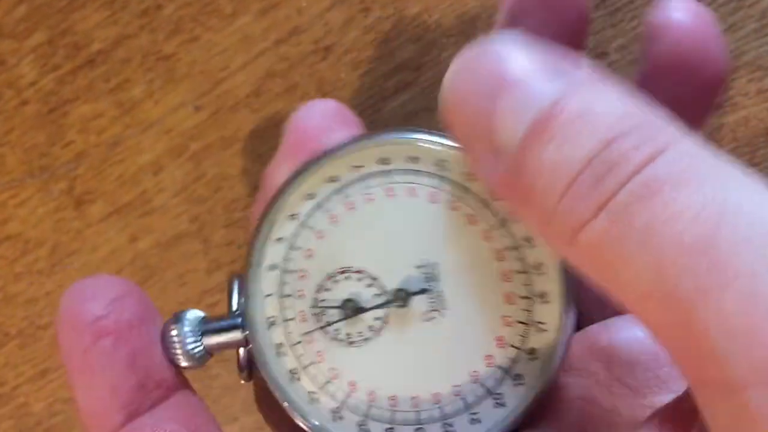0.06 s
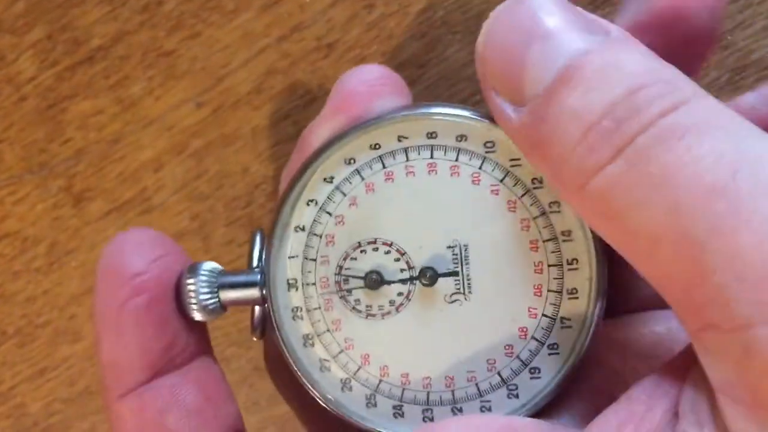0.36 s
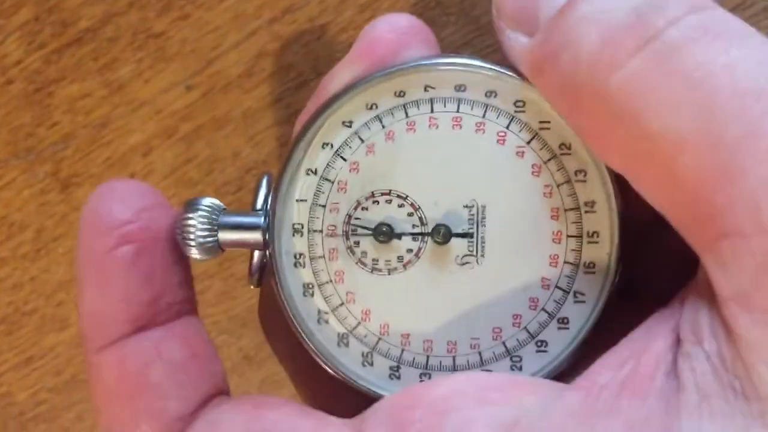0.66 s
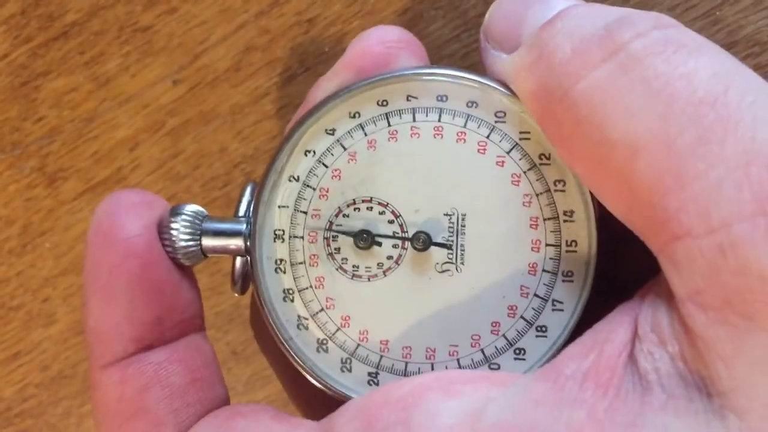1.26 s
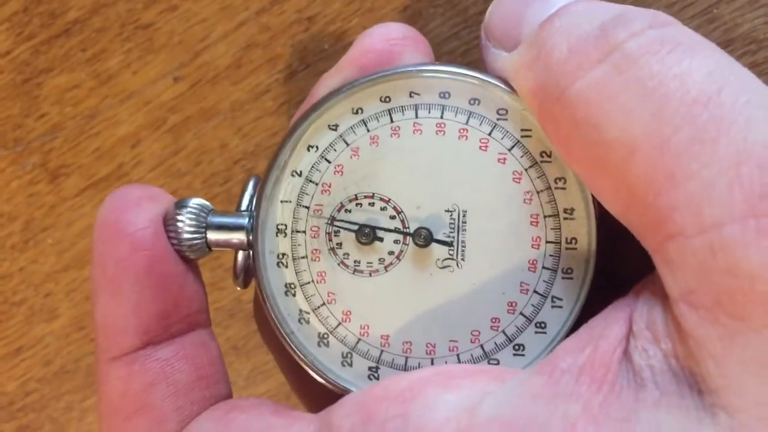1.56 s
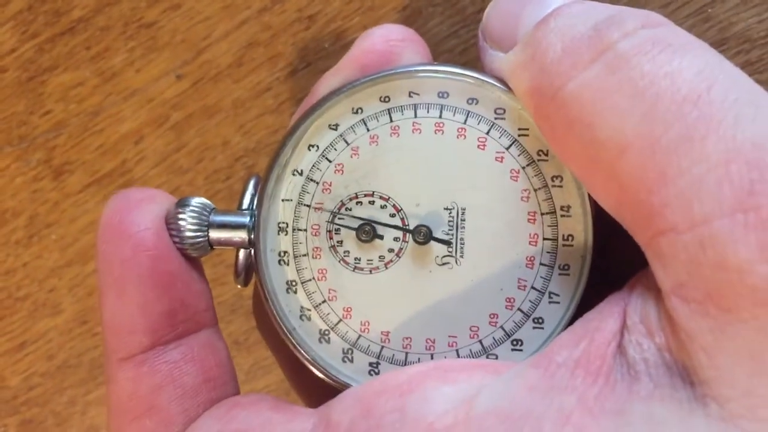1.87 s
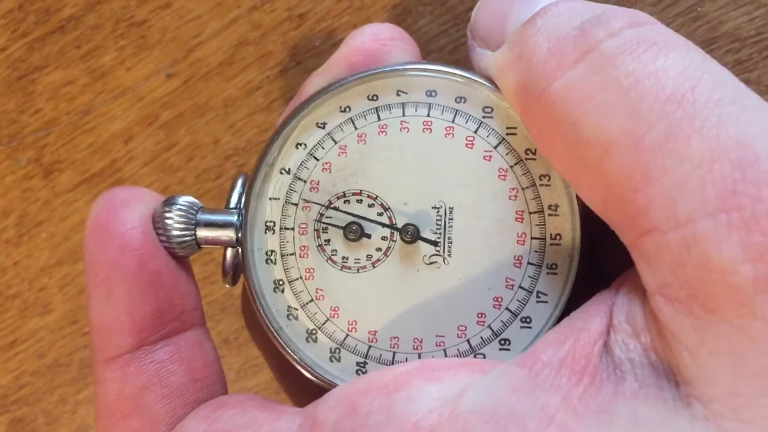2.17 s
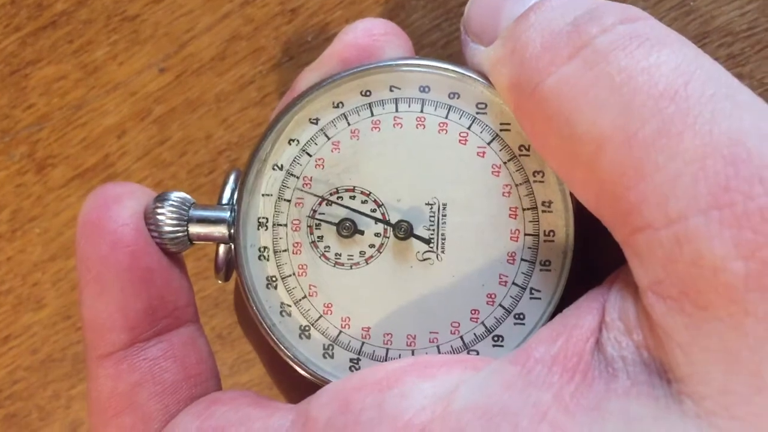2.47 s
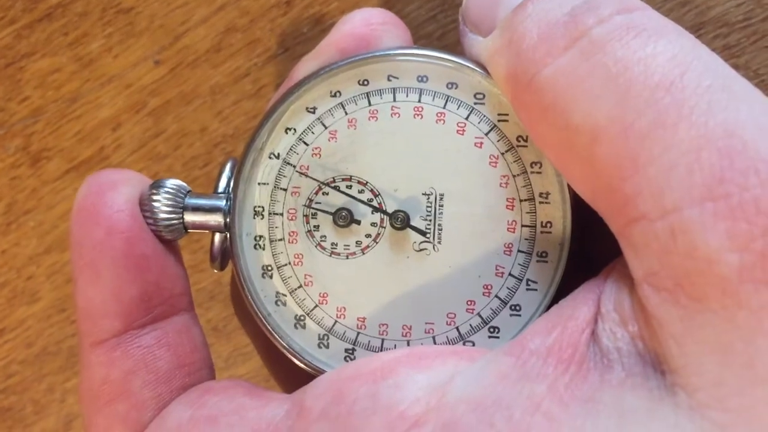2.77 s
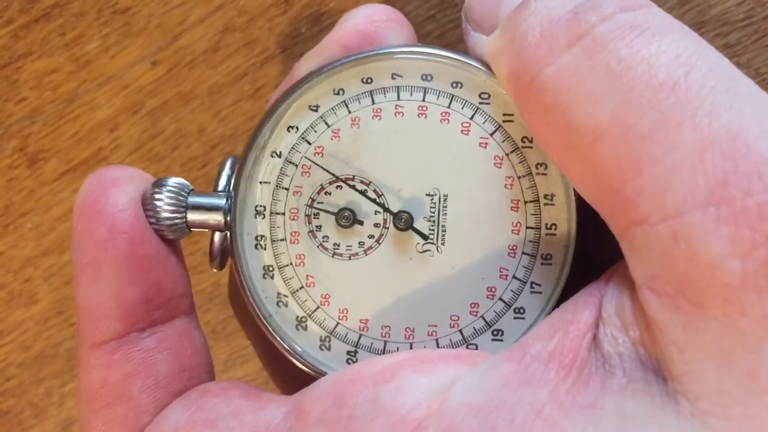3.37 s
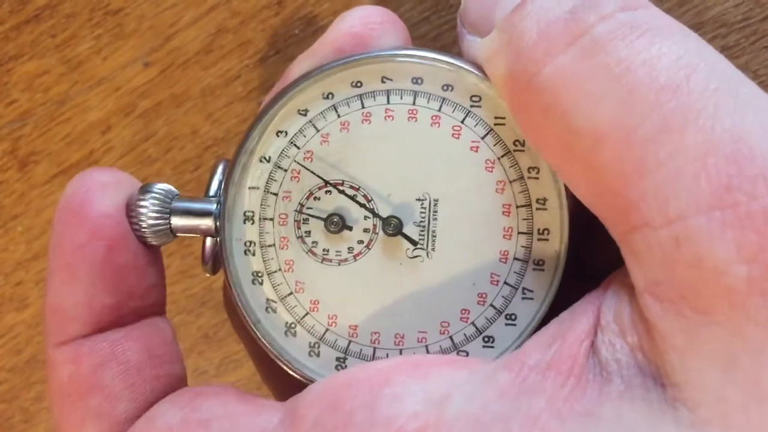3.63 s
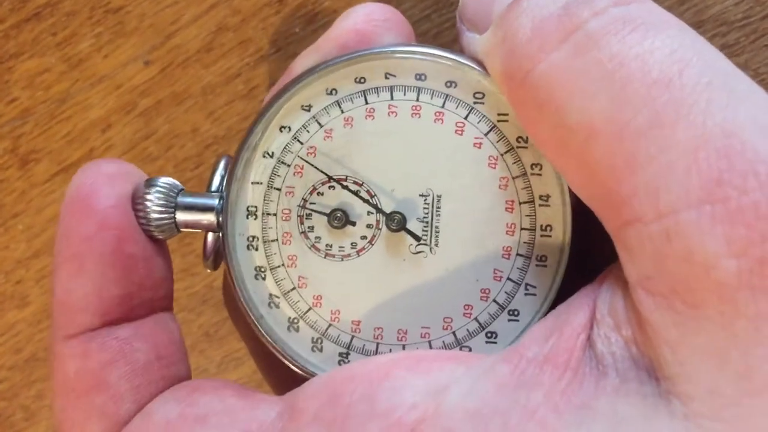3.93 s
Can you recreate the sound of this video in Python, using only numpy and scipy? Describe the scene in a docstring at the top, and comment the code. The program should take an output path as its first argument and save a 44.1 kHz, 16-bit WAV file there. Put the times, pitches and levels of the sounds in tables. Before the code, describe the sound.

A mechanical stopwatch ticks fast and evenly, close up in a small quiet room, with a few light button clicks and faint distant knocks. A loud metallic snap stops the ticking, and the button clicks again on release.

```python
"""A mechanical stopwatch ticks ten times a second, held close in a small quiet room. Each tick is a
tooth dropping on the pallet and ringing the plate; the hairspring sings on every other beat.
The crown clicks under the finger, is pressed home with a loud snap that stops the movement, and clicks
again as it is let go. Farther off something knocks softly once a second, like a wall clock."""
import sys
import numpy as np
from scipy import signal
from scipy.fft import rfft, irfft, next_fast_len
from scipy.io import wavfile
from scipy.ndimage import map_coordinates

SR = 44100
rng = np.random.default_rng(int(sys.argv[2]) if len(sys.argv) > 2 else 0)


def master_out(mix):
    """Clip the mix to full scale and print it as 16-bit PCM to the path in sys.argv[1]."""
    frames = np.transpose(np.atleast_2d(mix))
    ceiling = np.clip(frames, -1, 1)
    pcm = np.round(ceiling * 32767).astype(np.int16)
    wavfile.write(sys.argv[1], SR, pcm)


N = 176400
T = np.arange(SR // 2) / SR  # time within one hit [s]

# escapement beats (time [s], bright edge level [dB], body level [dB])
BEATS = [(0.0853, -61, -61), (0.1827, -44.5, -53.5), (0.2838, -50, -45.5), (0.3831, -45, -58),
         (.4843, -57.5, -63), (0.586, -51.5, -59.5), (.685, -60, -58.5), (0.7849, -49, -56.5),
         (0.8855, -60, -54), (0.9839, -57.5, -60.5), (1.0872, -66, -60), (1.1854, -50.5, -49.5),
         (1.286, -60, -54.5), (1.3855, -51, -57.5), (1.4882, -59, -56.5), (1.587, -58, -54),
         (1.689, -64, -59.5), (1.788, -53, -59), (1.8888, -67, -57.5), (1.9884, -58.5, -60),
         (2.0897, -68, -63), (2.1902, -55.5, -56), (2.2917, -64, -59.5), (2.3905, -52.5, -57),
         (2.4924, -59, -59.5), (2.5928, -59.5, -59), (2.6929, -59, -59.5), (2.7921, -56, -55.5),
         (2.893, -68, -56), (2.9925, -62, -60), (3.096, -65, -63), (3.1937, -58, -51), (3.295, -63, -59),
         (3.3938, -53, -56.5)]
# a tick's bright edge: narrow pallet resonances (frequency [Hz], gain [dB])
PALLET_EQ = [(8000, -31), (10150, -26.5), (10700, -15.5), (11200, -14.5), (11900, -6), (12350, 2.5),
             (12950, -15), (13350, 4), (14000, -3), (14550, -18), (15200, -4), (15700, -6.5), (16200, -25)]
# body of a tick or a lever's scrape (frequency [Hz], gain [dB])
BODY_EQ = [(1000, -27.5), (1900, -12.5), (2420, 3.5), (2950, -9.5), (3550, 4), (4600, -12), (5400, 1),
           (6450, 1.5), (7400, -3.5), (8300, -2), (10000, -5.5), (13000, -24)]
# modes of the movement's plate (frequency [Hz], level [dB], t60 [s])
PLATE_MODES = [(2240, -10, .06), (2500, -2.5, .05), (3500, -6.5, .03), (5300, -11, 0.051),
               (6380, -7, 0.054), (7400, -9, 0.032), (8240, -9, 0.023)]
# swell of the hairspring's singing (time [s], level [dB])
SPRING_SWELL = [(.08, -71), (.5, -69.5), (.7, -75), (.89, -59.5), (1.09, -70), (1.29, -58), (1.49, -60),
                (1.69, -53.5), (1.89, -55.5), (2.09, -55), (2.29, -60), (2.49, -54.5), (2.69, -56.5),
                (2.89, -66.5), (3.09, -67), (3.29, -59.5)]
# bursts in one balance swing (delay [s], frequency [Hz], level [dB], attack [s], t60 [s])
SWING_BURSTS = [(.004, 3610, -1.5, .002, .05), (.0115, 3575, 7, .002, .065), (.052, 3650, -5.5, .018, .1)]
# crown clicks (time [s], level in each of the six CLICK_BANDS [dB], decay stretch [ratio])
CROWN_CLICKS = [(0.2932, -32, -32.5, -31, -30, -47.5, -50, 1.08),
                (0.769, -55.5, -62, -72, -82, -86, -86, 2), (0.8518, -43, -44, -50, -52, -74, -82, 1.43),
                (1.577, -40.5, -40.5, -43, -53.5, -63.5, -65, 1.04),
                (3.4341, -37.5, -41.5, -35.5, -39.5, -44.5, -56.5, 1.08),
                (3.4702, -65.5, -69, -66, -65, -60, -63, 0.82),
                (3.4745, -50.5, -55, -47, -59, -57, -70, 1.35),
                (3.4813, -66, -65.5, -63, -72, -65, -72, 0.79),
                (3.4932, -18.5, -12, -17, -13.5, -14, -15, 0.94),
                (3.6708, -44, -51, -64, -73, -80, -80, 0.89), (3.71, -51.5, -53, -48, -64, -66, -70, 2.4),
                (3.7183, -50.5, -35.5, -41, -56.5, -64, -65, 1.3),
                (3.7228, -35, -27, -26.5, -29.5, -27, -42, 1.19),
                (3.846, -57, -65, -66.5, -77, -84, -83.5, 1.5),
                (3.973, -36, -39.5, -42.5, -49.5, -53.5, -63.5, 1)]
# bands that voice a click (low edge [Hz], high edge [Hz])
CLICK_BANDS = [(1000, 2100), (2100, 2700), (2700, 4800), (4800, 7000), (7000, 11800), (11800, 16000)]
# modes of the steel case (frequency [Hz], level [dB], unstretched t60 [s])
CASE_MODES = [(1310, -8, .02), (1560, -3, .018), (1880, -4, .018), (2075, -3, .022), (2395, 4, .026),
              (2600, -8, .018), (2910, -6, .026), (3470, -1, .02), (3900, -13, .018), (4250, -14, .014),
              (5380, -5, .016), (6550, 4, .014), (7350, -4, .016), (8240, -6, .022), (8830, -8, .014),
              (9430, -1, .01), (11100, -4, .007), (12780, -1, .016), (14070, -9, .014), (14900, -6, .007)]
# noisy crack of a blow on the case (frequency [Hz], gain [dB])
CRACK_EQ = [(60, -18.5), (300, -26), (850, -24), (1250, 4.5), (2400, -2), (4000, -4), (4800, -13),
            (6300, -1), (10000, -4.5), (15000, -1.5), (16200, -16.5)]
# thump as the snap jolts the hand (frequency [Hz], gain [dB])
THUMP_EQ = [(25, -4.5), (80, 7.5), (170, -6), (450, 2.5), (750, -6.5), (1000, -16), (1500, -30.5)]
# what the snap throws sideways into the room (frequency [Hz], gain [dB])
SPRAY_EQ = [(600, -39), (1200, -3.5), (2500, 0), (4500, -5.5), (6000, -5.5), (11000, -8), (16000, -7.5)]
# springs left ringing by press and release (time [s], frequency [Hz], level [dB], t60 [s])
SPRING_RINGS = [(3.4345, 6700, -59, 0.13), (3.4935, 2310, -48, 0.7), (3.4923, 2400, -47, .22),
                (3.4935, 2907, -48, .19), (3.4935, 3262, -58.5, .35), (3.723, 1110, -63.5, 0.47),
                (3.725, 4480, -63, .45), (3.722, 2859, -46, 0.19), (3.723, 3340, -55, 0.13)]
# distant knocks, in clusters a second apart (time [s], level [dB])
KNOCKS = [(.152, -48.5), (0.159, -45.5), (0.1677, -42), (0.174, -51.5), (1.167, -56.5), (1.176, -54.5),
          (1.186, -53.5), (2.152, -49), (2.159, -44.5), (2.1677, -43.5), (2.201, -46.5), (2.206, -48.5),
          (2.2124, -48), (2.216, -52), (3.167, -47.5), (3.176, -48.5), (3.187, -50), (3.196, -50.5)]
# dull colour of a knock (frequency [Hz], gain [dB])
KNOCK_EQ = [(40, -32), (140, -29), (280, -6), (420, -17.5), (600, -5.5), (850, -15.5), (1200, 5),
            (1700, -5), (2400, -7), (3200, -10.5), (4100, -7), (5000, -26), (6500, -23.5), (9000, -52),
            (16000, -36)]
# reverb decay (frequency [Hz], t60 [s])
REVERB_DECAY = [(100, 0.39), (1200, 0.17), (3000, 0.24), (7000, 0.18), (15000, .22)]
# reverb colour (frequency [Hz], gain [dB])
REVERB_EQ = [(80, -11.5), (300, 2), (1500, -1.5), (2800, -5), (6000, -10.5), (14000, -11.5)]
# room tone (frequency [Hz], gain [dB])
ROOM_TONE_EQ = [(12, -36.5), (20, -9), (70, 0), (285, 2), (485, -1.5), (542, -5), (759, -5.5), (1330, -4),
                (2140, -8.5), (2390, -6.5), (2910, -9.5), (3630, -9), (3950, -11), (4940, -13.5),
                (6540, -12.5), (8650, -16), (10200, -18.5), (13900, -18), (16000, -23)]

TICK_DB, TICK_T60_S, TICK_HOLD_S, PLATE_DB = -6.5, .02, .0012, -4.5
UNLOCK_LEAD_S, UNLOCK_DB = .0105, -13
HAIRSPRING_DB, HAIRSPRING_WOBBLE_RAD, RING_WOBBLE_RAD = -4, .3, .7
CLICK_DB, CRACK_DB, CRACK_T60_S, CASE_LOW_CUT_HZ = -1, -7.5, .017, 1160
SCRAPE_S, SCRAPE_DB, SCRAPE_MAX_DB = .0074, -22.5, -48
THUMP_DB, THUMP_T60_S, SPRAY_DB = -38, .03, -13.5
KNOCK_T60_S, KNOCK_WET_DB = .035, -4
WATCH_WET_DB, REVERB_ONSET_S, ROOM_TONE_DB = -15.5, .0057, -69.5
UNIT_HIT_S, TOP_HZ = .003, 16000


def escapement():
    """Each beat: the pallet faintly unlocks, then the tooth drops on it and rings the plate."""
    out = np.zeros(N)
    for s, edge_db, body_db in BEATS:
        for lead, db in ((UNLOCK_LEAD_S, UNLOCK_DB), (0, 0)):
            edge = amp(edge_db) * burst(PALLET_EQ, TICK_T60_S, TICK_HOLD_S)
            body = amp(body_db) * burst(BODY_EQ, TICK_T60_S, TICK_HOLD_S)
            add(out, s - lead, amp(TICK_DB + db) * (edge + body))
        add(out, s, amp(body_db + PLATE_DB) * modes(PLATE_MODES))
    return out


def hairspring():
    """The spring sings in short bursts once per full swing of the balance."""
    out = np.zeros(N)
    for s, _, _ in BEATS[::2]:
        swell_db = np.interp(s, *np.transpose(SPRING_SWELL))
        for delay, hz, db, attack, t60 in SWING_BURSTS:
            envelope = np.minimum(T / attack, 1) * decay(t60, hold=attack)
            tone = np.sin(2 * np.pi * hz * T + HAIRSPRING_WOBBLE_RAD * wobble(300))
            add(out, s + delay, amp(swell_db + db + HAIRSPRING_DB) * envelope * tone)
    return out


def crown():
    """The crown and its levers click; the loudest snap thumps and fills the room, and springs ring on."""
    out, spray = np.zeros(N), np.zeros(N)
    for s, *levels_db, stretch in CROWN_CLICKS:
        add(out, s, amp(CLICK_DB) * voiced(case_ring(stretch), levels_db))
        scrape_db = min(max(levels_db) + SCRAPE_DB, SCRAPE_MAX_DB)
        add(out, s - SCRAPE_S, amp(scrape_db) * lever_scrape())
    snap_s = max(CROWN_CLICKS, key=lambda click: click[1])[0]
    add(out, snap_s, amp(THUMP_DB) * burst(THUMP_EQ, THUMP_T60_S))
    add(spray, snap_s, amp(SPRAY_DB) * burst(SPRAY_EQ, CRACK_T60_S))
    for s, hz, db, t60 in SPRING_RINGS:
        tone = np.sin(2 * np.pi * hz * T + RING_WOBBLE_RAD * wobble(90))
        add(out, s, amp(db) * decay(t60) * tone)
    return out + amp(WATCH_WET_DB) * reverb(spray)


def case_ring(stretch):
    """One blow on the case: short modes and a crack; the small case radiates no bass."""
    ring = unit_hit(modes(CASE_MODES, stretch))
    crack = amp(CRACK_DB) * burst(CRACK_EQ, CRACK_T60_S * stretch)
    low_cut = signal.butter(12, CASE_LOW_CUT_HZ, "high", fs=SR, output="sos")
    return signal.sosfilt(low_cut, ring + crack)


def lever_scrape():
    """A lever slides for a moment before it drops: noise swelling into the click."""
    swell = np.linspace(0, 1, int(SCRAPE_S * SR) + 2)
    friction = coloured(rng.standard_normal(len(T)), BODY_EQ)[:len(swell)]
    return swell * friction / friction.std()


def distant_knocks():
    """A dull clatter once a second, with plenty of room on it."""
    out = np.zeros(N)
    for s, db in KNOCKS:
        add(out, s, amp(db) * burst(KNOCK_EQ, KNOCK_T60_S))
    return out + amp(KNOCK_WET_DB) * reverb(out)


def reverb(x):
    """The small room's answer: a short diffuse tail that lingers longest in the bass."""
    hz, t, spectrum = signal.stft(rng.standard_normal(len(T)), SR, nperseg=256)
    fade = amp(-60 * t / along(REVERB_DECAY, hz)[:, None])
    tail = signal.istft(spectrum * fade, SR, nperseg=256)[1][:len(T)]
    tail *= np.clip(T / REVERB_ONSET_S - .5, 0, 1)  # soft pre-delay
    return signal.fftconvolve(x, coloured(tail / np.linalg.norm(tail), REVERB_EQ))[:N]


def room_tone():
    """A steady bed of faint rumble and hiss."""
    bed = coloured(rng.standard_normal(N), ROOM_TONE_EQ)
    return amp(ROOM_TONE_DB) * bed / bed.std()


def modes(table, stretch=1):
    """Struck metal: short ringing modes, a little different at every blow."""
    return sum(rng.choice([-1, 1]) * amp(db + rng.normal(0, 1))
               * decay(t60 * stretch) * np.sin(2 * np.pi * hz * T) for hz, db, t60 in table)


def burst(eq, t60, hold=0):
    """A coloured burst of noise that holds, then dies."""
    return unit_hit(coloured(rng.standard_normal(len(T)) * decay(t60, hold), eq))


def voiced(hit, levels_db):
    """EQ a hit toward its level in each band: a harder contact is brighter."""
    hz = np.fft.rfftfreq(len(hit), 1 / SR)
    for _ in range(2):
        power = 2 * abs(rfft(hit)) ** 2 / (len(hit) * UNIT_HIT_S * SR)
        eq = [(np.sqrt(lo * hi), db - 10 * np.log10(power[(hz > lo) & (hz < hi)].sum()))
              for (lo, hi), db in zip(CLICK_BANDS, levels_db)]
        hit = coloured(hit, eq)
    return hit


def coloured(x, eq):
    """Minimum-phase EQ through (frequency [Hz], gain [dB]) points."""
    size = 2 * next_fast_len(len(x) // 2 + 4096)
    cepstrum = irfft(along(eq, np.fft.rfftfreq(size, 1 / SR)) * np.log(10) / 20)
    cepstrum[1:size // 2] *= 2
    cepstrum[size // 2 + 1:] = 0
    return irfft(rfft(x, size) * np.exp(rfft(cepstrum)), size)[:len(x)]


def along(points, hz):
    """Read a curve on a log frequency axis."""
    knots_hz, values = np.transpose(points)
    return np.interp(np.log(hz + 1), np.log(knots_hz + 1), values)


def unit_hit(x):
    """Scale a hit to the energy of UNIT_HIT_S at full level."""
    return x / np.sqrt(np.sum(x ** 2) / (UNIT_HIT_S * SR) + 1e-20)


def decay(t60, hold=0):
    """An envelope that holds, then falls 60 dB every t60 seconds."""
    return amp(-60 * np.maximum(T - hold, 0) / t60)


def wobble(rate):
    """A smooth random curve over one hit, rate knots a second."""
    return map_coordinates(rng.standard_normal(int(rate) + 4), [T * rate])


def amp(db):
    return 10 ** (np.asarray(db) / 20)


def add(track, s, x):
    """Mix x into the track at s seconds."""
    start = max(round(s * SR), 0)
    track[start:start + len(x)] += x[:max(N - start, 0)]


def scene():
    """The watch up front, the knocks behind it, the quiet room underneath; mono."""
    watch = escapement() + hairspring() + crown()
    return (watch + amp(WATCH_WET_DB) * reverb(watch) + distant_knocks() + room_tone())[None]


def record(dry):
    """Clip at full scale, then cut the treble steeply above TOP_HZ."""
    size = next_fast_len(N + SR // 2)
    high_cut = 1 / (1 + (np.fft.rfftfreq(size, 1 / SR) / TOP_HZ) ** 160)
    return irfft(rfft(np.clip(dry, -1, 1), size) * high_cut, size)[:, :N]


dry = scene()
out = record(dry)
master_out(out)
```